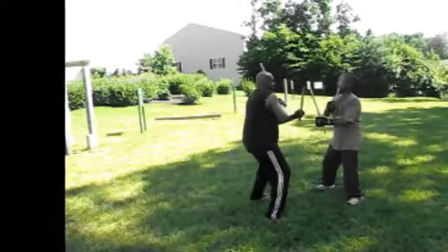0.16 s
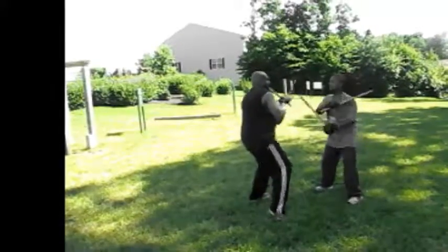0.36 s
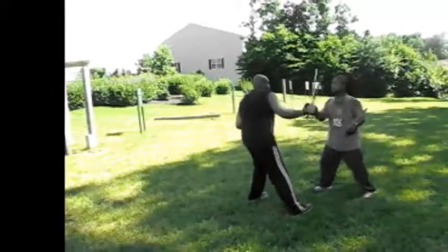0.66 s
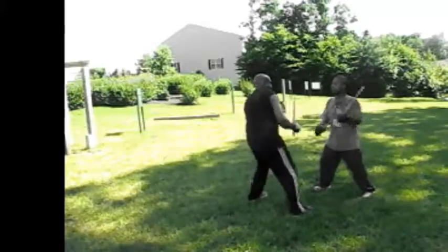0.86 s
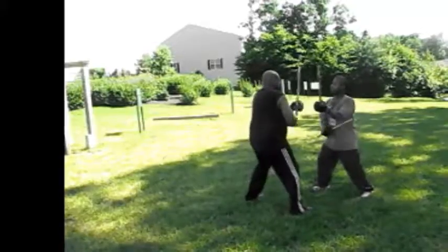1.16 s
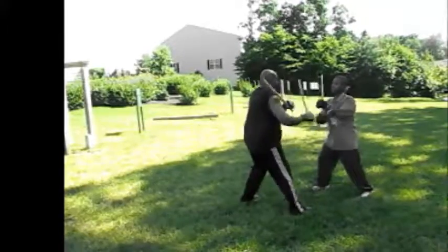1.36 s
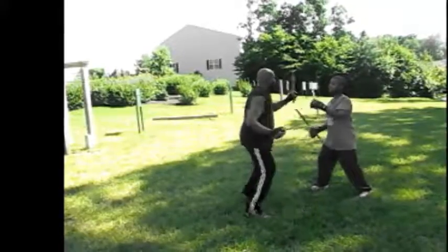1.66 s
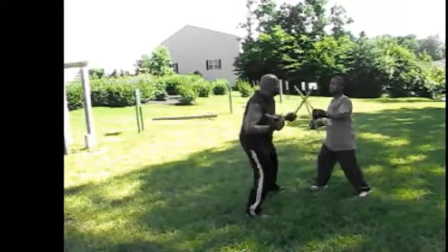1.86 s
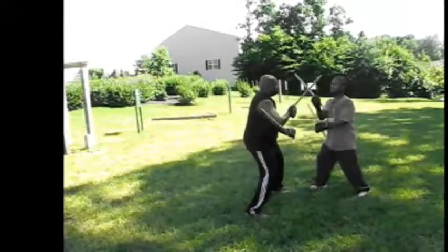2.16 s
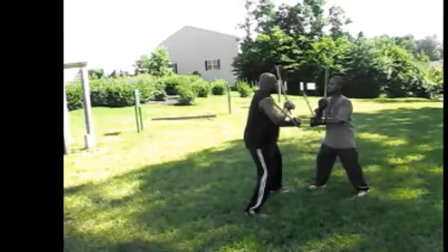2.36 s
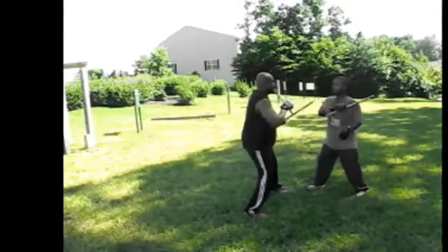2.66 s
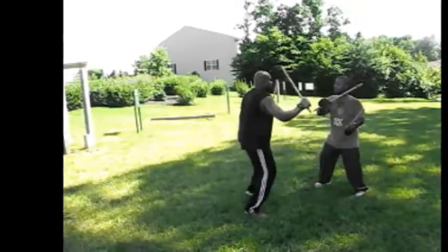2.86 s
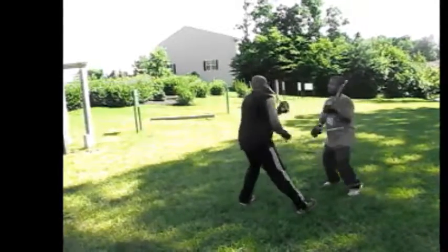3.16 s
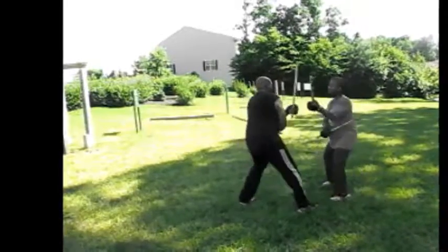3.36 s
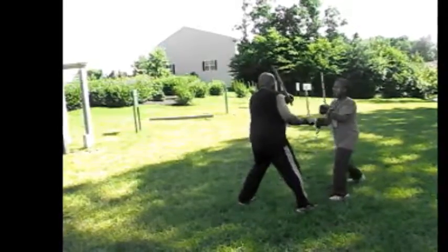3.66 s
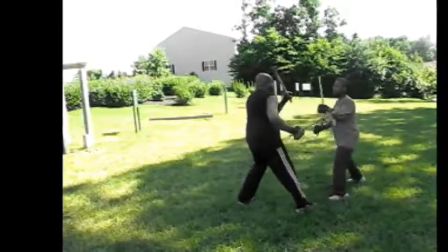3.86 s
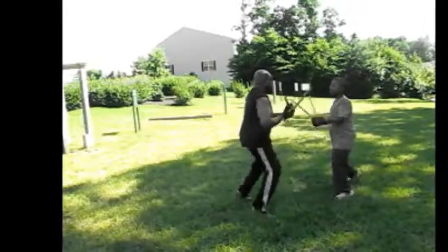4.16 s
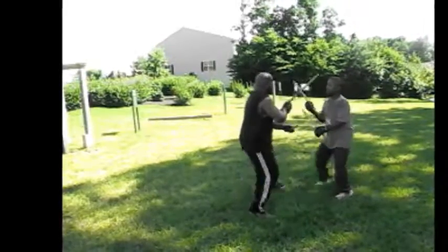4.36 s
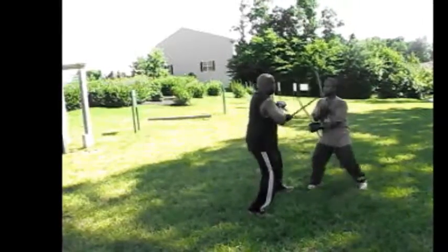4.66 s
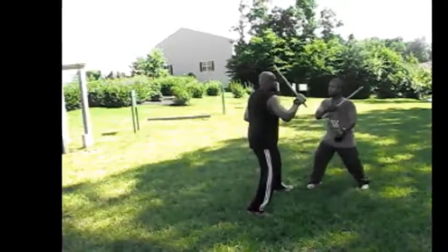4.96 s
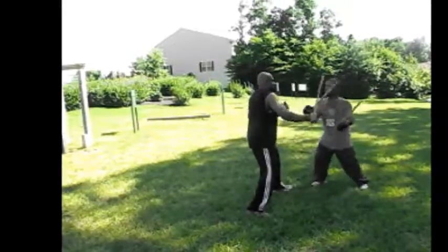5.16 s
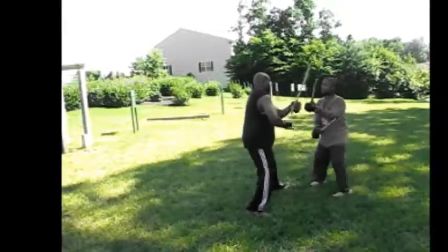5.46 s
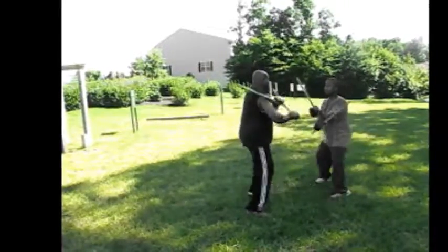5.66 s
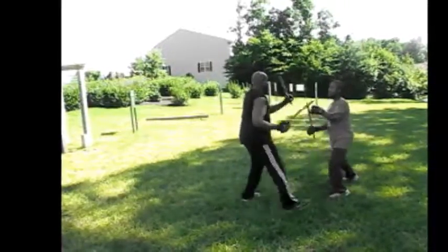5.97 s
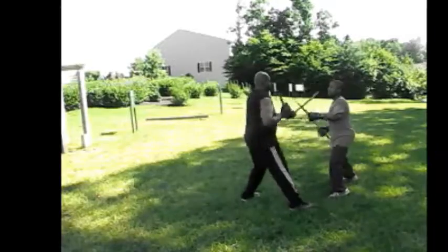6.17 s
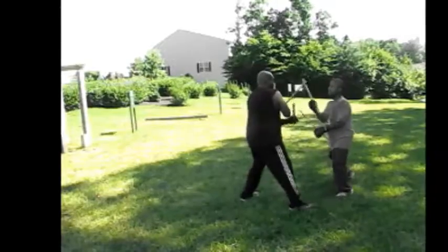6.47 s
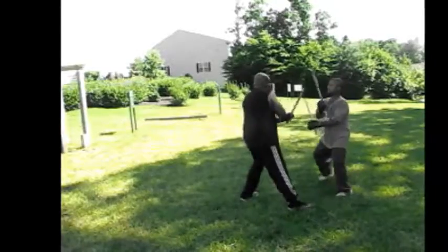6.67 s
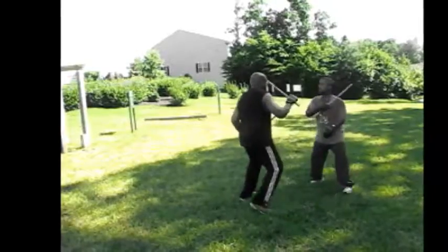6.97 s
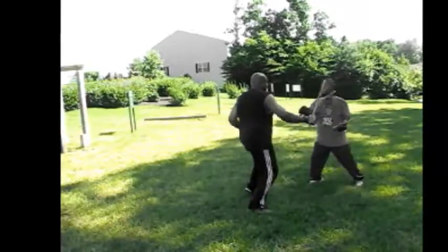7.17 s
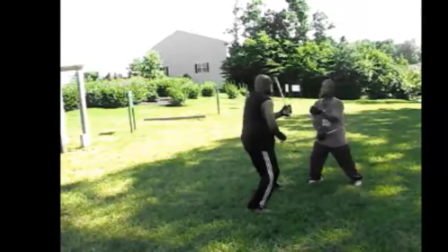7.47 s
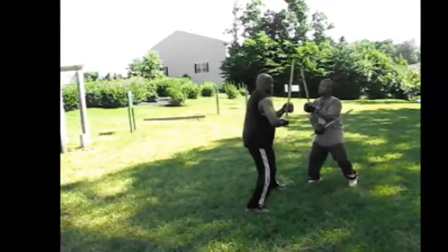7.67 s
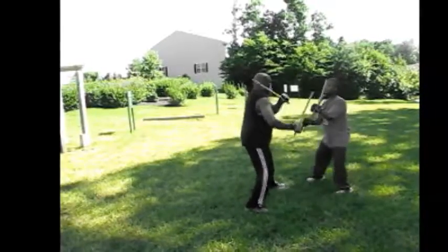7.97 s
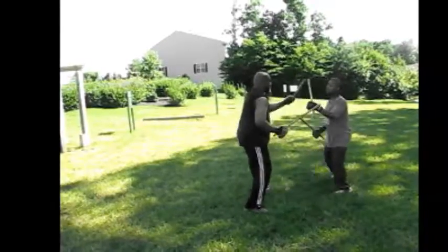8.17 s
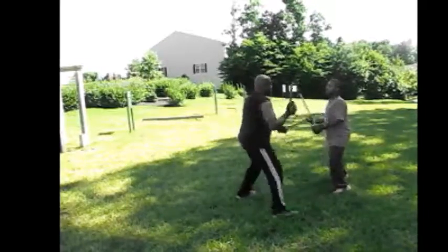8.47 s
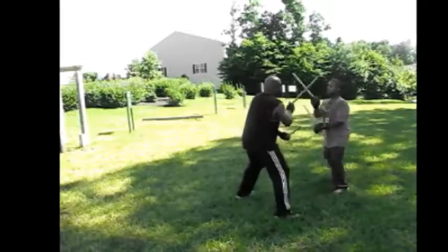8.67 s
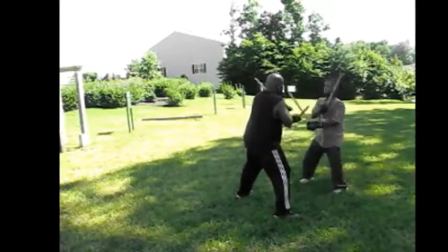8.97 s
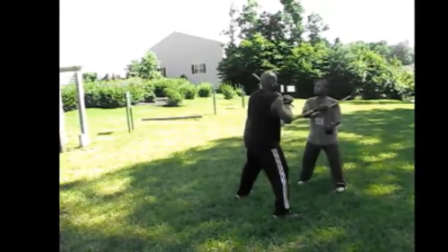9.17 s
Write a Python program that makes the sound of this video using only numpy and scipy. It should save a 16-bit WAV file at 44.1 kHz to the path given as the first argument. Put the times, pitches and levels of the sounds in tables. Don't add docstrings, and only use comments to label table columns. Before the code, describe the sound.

Sharp, dry wooden stick strikes in a steady sparring rhythm outdoors, lightly echoing off houses, over soft foot drags and quiet neighbourhood hiss.

```python
import sys
import numpy as np
from scipy import signal
from scipy.fft import rfft, irfft, next_fast_len
from scipy.io import wavfile
from scipy.ndimage import uniform_filter1d

SR = 44100
rng = np.random.default_rng(int(sys.argv[2]) if len(sys.argv) > 2 else 0)


def natural_amplitude(level_db):
    exponent = np.asarray(level_db, float) / 20
    return 10 ** exponent


def output_pcm(signal):
    pcm = np.clip(np.atleast_2d(signal).T, -1, 1) * 32767
    wavfile.write(sys.argv[1], SR, np.round(pcm).astype(np.int16))


N = 411453
LEAD = 2000


def level(x, db):
    return x * natural_amplitude(db) / np.sqrt(np.mean(x ** 2))


def colour(x, points, delay=0):
    hz, db = np.transpose(points)
    size = next_fast_len(x.shape[-1], True)
    f = np.maximum(np.fft.rfftfreq(size, 1 / SR), 1)
    log_gain = np.log(natural_amplitude(np.interp(np.log(f), np.log(hz), db)))
    fold = irfft(log_gain, size)
    fold[1:size // 2] *= 2
    gain = np.exp(rfft(fold[:size // 2], size) - 2j * np.pi * f * delay / SR)
    return irfft(rfft(x, size) * gain, size)[..., :x.shape[-1]]


def band(x, hz, width):
    return signal.lfilter(*signal.iirpeak(hz, hz / width, SR), x)


def low_pass(x, hz):
    return signal.lfilter(*signal.butter(2, hz, fs=SR), x)


def walk(rate):
    k = int(SR / rate)
    held = np.repeat(rng.standard_normal(N // k + 1), k)
    return 1.4 * uniform_filter1d(uniform_filter1d(held, k), k)[:N]


def pair(length, alike_hz):
    mid, side = rng.standard_normal((2, length))
    side = signal.lfilter(*signal.butter(1, alike_hz, "high", fs=SR), side)
    return np.array([mid + side, mid - side])


def ring(t, hz, t60, rise):
    t = np.maximum(t, 0)
    decay = np.exp(-np.log(1000) * t / t60)
    return (1 - np.exp(-t / rise)) * decay * np.sin(2 * np.pi * hz * t)


def fibres(length):
    hiss = signal.lfilter(*signal.butter(2, 5000, "high", fs=SR), rng.standard_normal(length))
    return hiss * np.exp(-np.log(1000) * np.arange(length) / SR / 0.027)


# time in s, strength in dB, hardness in dB,
# strength thrown sideways in dB.
STRIKES = [(-.0075, -5.5, -1.5, -10.5), (.3041, -8.5, -3.5, -17), (0.7262, -13, -6.5, -14),
           (1.1174, -6.5, 0.5, -11), (1.486, -13.5, 3, -7), (1.803, -10.5, 4.5, -14.5),
           (2.2584, -5, -0.5, -10.5), (2.592, -6, -4.5, -11.5), (2.6434, -9, -10, -18),
           (3.0177, -9.5, -2, -7.5), (3.3723, -2.5, -7.5, -9.5), (3.77, -7.5, -1.5, -6.5),
           (4.0853, -4.5, 1.5, -8.5), (4.4914, -6.5, 4, -11), (4.7818, -16.5, -8, -17),
           (5.1801, -9.5, -0.5, -6.5), (5.4967, -7, 1.5, -8), (5.8411, -7.5, 5, -8), (6.1258, -10, 4, -12),
           (6.5306, -7.5, 1.5, -10.5), (6.807, -17.5, 0.5, -19.5), (7.1866, -8, 0.5, -7.5),
           (7.5993, -5, -0.5, -12), (7.9792, -8, 0.5, -9), (8.285, -8, 2, -11), (8.7559, -3.5, -4.5, -10.5),
           (9.1041, -8.5, -4.5, -18.5)]
# low, middle, high and crack pitch in Hz.
SPOTS = [(2000, 2600, 3900, 3500), (2240, 3130, 4700, 3100), (1714, 2900, 4400, 2730),
         (2300, 2880, 4100, 2950), (2030, 2460, 4590, 2500), (1855, 3580, 5100, 5100),
         (2280, 3430, 4170, 3490), (2080, 2714, 3510, 3380), (2110, 2710, 4130, 3380),
         (1930, 2820, 4730, 2900), (2026, 2600, 4580, 2930), (1456, 3640, 4400, 3450),
         (1933, 3500, 4060, 4000), (2094, 3430, 4150, 4330), (2030, 2690, 3690, 3500),
         (1546, 2554, 4150, 3000), (2130, 3600, 4550, 3010), (2110, 2600, 4160, 4110),
         (2300, 3570, 3970, 3900), (2120, 2740, 5500, 5510), (1990, 2260, 3870, 2200),
         (1870, 3350, 5020, 4870), (1980, 3605, 4200, 3620), (1976, 2516, 4200, 6440),
         (2280, 3510, 4040, 3880), (2084, 3300, 4290, 3510), (2153, 3360, 4090, 3340)]
# low mode level in dB, bounce lag in ms, bounce level in dB,
# ground reflection lag in ms.
CONTACTS = [(-32.5, 1.5, -3.5, 3), (-23, 1.16, -4.5, 3.42), (-26.5, 0.69, 2, 2.1), (-16, .85, -6, 4.04),
            (-21, .89, -1.7, 3.6), (-22, 0.56, 8, 3.6), (-19.5, 1.52, -7.5, 5.6), (-17.5, 0.79, -10, 3.9),
            (-27.5, 1.64, -1.7, 3.3), (-17.5, 0.95, -14, 3.31), (-18.5, .61, -10.5, 3.4),
            (-21, 1.23, -2.5, 3.34), (-17, 1.06, -3, 2.4), (-25.5, 0.5, -6.5, 3.1),
            (-24.5, 0.533, -5, 3.26), (-21, 1.2, 7, 3.02), (-16.5, 1.17, -5, 1.6), (-18.5, 1.28, -4, 2.7),
            (-21.5, 1, 1.8, 5.6), (-19, 0.67, -2.5, 2.8), (-21, 0.36, -34, 3.8), (-20.5, 1.5, -12, 3.16),
            (-16.5, .65, 5.5, 3.15), (-19.5, .56, 2.7, 5.2), (-22, .82, 2, 2.61), (-24.5, 1.363, -10, 2.5),
            (-24, 1.3, -11, 2.3)]
# pitch in Hz, level in dB, t60 in s.
STICK_MODES = [(308, -10, 0.054), (660, -8.5, 0.039), (1022, -4.5, 0.047), (1262, -8, 0.04),
               (1490, -2.5, 0.036), (1665, -4.5, 0.031), (2018, -1.5, 0.034), (2298, -4.5, 0.025),
               (2600, -4, 0.031), (2819, -2.5, 0.028), (3311, -4.5, 0.024), (3580, 0, 0.015),
               (4042, -3, 0.023), (4736, -5, 0.024), (5370, -9, 0.0053), (5665, 2, 0.013),
               (6380, 0.5, 0.013), (7460, 0.5, 0.0072), (8550, 0.5, 0.0077), (10300, 0, 0.0071),
               (13500, -12.5, 0.0045)]
TONE_HZ = np.log([900, 1800, 3000, 4800, 9000])
GRIP = 1.34
GROUND_DB, GROUND_FALL = -7.5, 0.49


def sticks():
    out, t = np.zeros(N + 2 * LEAD), np.arange(LEAD)[:, None] / SR
    hz, db, t60 = np.transpose(STICK_MODES)
    chance = rng.standard_normal((len(STRIKES), 3, 2, len(hz)))
    for strike, spot, contact, draw in zip(STRIKES, SPOTS, CONTACTS, chance):
        s, mid_db, hard, _ = strike
        *favoured, crack_hz = spot
        low_db, bounce_ms, bounce_db, ground_ms = contact
        first = int(s * SR) - 40
        start = LEAD + first
        lead_db = -max(0, bounce_db)
        gains_db = lead_db, lead_db + bounce_db, GROUND_DB - GROUND_FALL * hard
        snap_db = mid_db - 21.5 + 1.4 * hard
        high_db = mid_db - 7 + 0.9 * hard
        tone = np.array([low_db - 15, low_db + 0.5, mid_db - 7.5, high_db, snap_db + 2.5])
        spread = db + np.interp(np.log(hz), TONE_HZ, tone)
        for lag, gain_db, (weight, detune) in zip((0, bounce_ms, ground_ms), gains_db, draw):
            since = t + first / SR - s - lag / 1000
            crack_db = [mid_db + 3 + 0.96 * hard - 2.4 * lag, snap_db + 15 - 3.1 * lag]
            crack = ring(since, np.array([crack_hz, 9500]), np.array([.0032, .0014]), .00004) @ natural_amplitude(crack_db)
            weights = np.sign(detune) * natural_amplitude(spread + 2.6 * weight)
            body = ring(since, hz * (1 + 0.03 * detune), t60 / GRIP, 0.000067) @ weights
            favoured_t60 = np.array([.026, .022, .018]) / GRIP
            favoured_gain = natural_amplitude(tone[1:4] + np.array([3.5, 5, 4]))
            body += ring(since, np.array(favoured), favoured_t60, 0.00042) @ favoured_gain
            out[start:start + LEAD] += natural_amplitude(gain_db) * (crack + body)
        out[start + 40:start + 40 + LEAD] += natural_amplitude(snap_db - 7.5) * fibres(LEAD)
    return signal.sosfilt(signal.butter(3, 450, "high", fs=SR, output="sos"), out)


def thrown():
    out, t = np.zeros((2, N + 2 * LEAD)), np.arange(LEAD)[:, None] / SR
    hz, db, t60 = np.transpose(STICK_MODES)
    chance = rng.standard_normal((len(STRIKES), 2, len(hz)))
    broad = db + np.interp(np.log(hz), TONE_HZ, [-16.5, -4.5, 3.0, 2.5, -10.0])
    near_far_db = [[2.1], [0]]
    for (s, *_, out_db), (*favoured, _), (weight, detune) in zip(STRIKES, SPOTS, chance):
        weights = np.sign(detune) * natural_amplitude(broad + 0.9 * weight)
        blow = ring(t, hz * (1 + 0.02 * detune), 0.31 * t60, .0001) @ weights
        blow += ring(t, np.array(favoured), 0.009, .0001) @ natural_amplitude([-12, -9, -5.5])
        first = LEAD + int(s * SR)
        out[:, first:first + LEAD] += level(blow, out_db - 16.5) * natural_amplitude(near_far_db)
    return out


# lag in s, level in dB, smear in ms, left minus right in dB,
# top in Hz.
ECHOES = [
    (0.031, -36, 1.3, 0.5, 6000),
    (0.046, -39, 3.8, 9.5, 5000),
    (0.0542, -36, 0.46, 8.5, 11600),
    (0.108, -43.5, 2, -2, 4000),
    (.196, -42.5, 4.9, -3.5, 4470),
    (.222, -46, 6.3, 1, 5000),
]
SCATTER_DB, SCATTER_START_S, SCATTER_RISE_S, SCATTER_T60_S = -41, 0.0029, .012, 1.276


def surroundings(near, far):
    t = np.arange(SR) / SR
    wash = colour(pair(SR, 900), [(300, -7.5), (1500, 4.5), (4500, 3.0), (7000, -5.5), (14000, -12)])
    build_up = 1 - np.exp(-np.maximum(t - SCATTER_START_S, 0) / SCATTER_RISE_S)
    response = level(wash, -22.0) * natural_amplitude(SCATTER_DB - 60 * t / SCATTER_T60_S) * build_up
    for delay, echo_db, smear_ms, pan_db, top_hz in ECHOES:
        shape = (t >= delay) * np.exp(-np.abs(t - delay) * 1000 / smear_ms)
        burst = low_pass(pair(SR, 1500) * shape, top_hz)
        response = response + level(burst, echo_db) / np.sqrt(SR) * natural_amplitude([[pan_db / 2], [-pan_db / 2]])
    early = t < .065
    back = signal.fftconvolve(near[None], response * early, axes=1)
    back = back + signal.fftconvolve(far[None], response * ~early, axes=1)
    return back[:, :len(near)]


# lag in s, level in dB, top in Hz, left minus right in dB.
BACK_WALL = (.262, -42, 3500, 2)


def back_wall(dry):
    lag, db, top_hz, pan_db = BACK_WALL
    slap = low_pass(np.roll(dry, int(lag * SR)), top_hz)
    return slap * natural_amplitude(db + np.array([[pan_db], [-pan_db]]) / 2)


# start in s, length in s, level in dB.
STEPS = [(-.1, 0.14, -78), (0.445, 0.26, -78), (1.145, .2, -78), (1.44, 0.24, -70), (1.85, .12, -72),
         (2.753, 0.32, -75.5), (3.013, .23, -69.5), (3.383, 0.37, -87.5), (3.848, 0.43, -71),
         (4.287, 0.2, -72), (5.049, 0.42, -78), (5.487, 0.43, -71.5), (5.845, 0.22, -70),
         (6.15, 0.2, -77.5), (6.63, .43, -74), (7.2, 0.12, -88), (7.704, 0.16, -77.5), (7.992, 0.58, -72.5),
         (8.9, 0.17, -81), (9.15, 0.22, -81.5)]
# pitch in Hz, level in dB per Hz.
GRASS = [(500, -12), (1200, -8), (2500, 0.5), (5000, 4.5), (8000, -1), (12000, -6), (15600, -8),
         (16000, -43.5)]
STEP_ATTACK_S, STEP_RELEASE_S, STEP_SWELL_DB, GRASS_REST_DB = 0.055, 0.029, 4.5, -91.5


def feet():
    t, drag = np.arange(N) / SR, natural_amplitude(GRASS_REST_DB)
    for s, length, db in STEPS:
        attack, release = (t - s) / STEP_ATTACK_S, (s + length - t) / STEP_RELEASE_S + 1
        shape = np.clip(np.minimum(attack, release), 0, 1)
        swell_db = STEP_SWELL_DB * np.clip((t - s) / length - 1, -1, 0)
        drag = np.hypot(drag, shape ** 2 * natural_amplitude(db + swell_db))
    grains = pair(N, 500) * natural_amplitude(1.6 * rng.exponential(size=N))
    return level(colour(grains, GRASS), 9) * drag * natural_amplitude(3.8 * walk(31) + 2.1 * walk(27))


# time in s, level in dB, length in ms, centre in Hz.
BRUSHES = [(.64, -60, 3.7, 4480), (1.68, -49.5, 3.3, 2814), (5.764, -52, 5.4, 3560),
           (7.869, -53, 4.5, 3020), (8.547, -48, 4.2, 2400), (8.41, -62, 29, 10200), (1.331, -52, 11, 2400),
           (1.464, -53, 20, 3950), (2.80, -61, 7.4, 9000), (2.974, -52.5, 10.5, 2830),
           (3.235, -59, 5.9, 7000), (3.97, -54.5, 20, 2760), (4.199, -56, 15, 2990),
           (4.217, -39.5, 3, 2600), (4.229, -46, 17, 1850), (5.219, -48, 7.5, 4030),
           (7.035, -54, 9.3, 4230), (7.043, -56.5, 7.4, 1770), (7.177, -51.5, 4, 3010)]


def brushes():
    out, t = np.zeros((2, N)), np.arange(-LEAD, LEAD) / SR
    for s, db, length_ms, hz in BRUSHES:
        rub = level(band(band(pair(2 * LEAD, 4500), hz, 1.7 * hz), hz, 0.72 * hz), db)
        middle = int(s * SR)
        out[:, middle - LEAD:middle + LEAD] += rub * np.exp(-(t * 1000 / length_ms) ** 2)
    return out


# time in s, level in dB.
BREEZE = [(0, -83.5), (.6, -79), (1.8, -75.5), (2.9, -73), (4.3, -71), (4.6, -87), (5, -67.5), (6.3, -72),
          (6.6, -82), (7.1, -78), (7.4, -67), (7.8, -79), (8.3, -71), (8.75, -75), (9.33, -86)]
# time in s, level in dB, pitch in Hz.
PUFFS = [(.6, -76.5, 75.4), (1.94, -64, 66), (2.28, -65.5, 66.8), (2.59, -59.5, 65.3), (2.84, -58.5, 63),
         (3.32, -68, 75.7), (3.58, -59, 67), (3.72, -58.5, 64.5), (4.04, -74.5, 65.7), (4.46, -71.5, 80.6),
         (4.85, -57.5, 65.2), (5.1, -62, 70.7), (5.31, -58.5, 72.2), (5.57, -60, 68.5), (5.85, -59.5, 63),
         (6.03, -57.5, 62.7), (6.46, -68.5, 65.8), (7.15, -60, 66.9), (8.2, -58.5, 64.8),
         (8.32, -58.5, 63.1), (8.48, -71, 62.8)]
BREEZE_HZ, PUFF_S, PUFF_SAG_HZ_PER_S = 75, 0.049, 100


def wind():
    t = np.arange(N) / SR
    breeze = natural_amplitude(np.interp(t, *np.transpose(BREEZE)))
    size, pull = breeze, breeze * BREEZE_HZ
    for s, db, hz in PUFFS:
        puff = natural_amplitude(db) * np.exp(-((t - s) / PUFF_S) ** 2)
        size, pull = size + puff, pull + puff * (hz - PUFF_SAG_HZ_PER_S * (t - s))
    phase = 2 * np.pi * np.cumsum(pull / size * (1 + 0.038 * walk(18))) / SR
    flutter = natural_amplitude(3.2 * walk(12))
    rumble = level(band(band(pair(N, 300), 49, 25), 49, 25), -3)
    ports = .08 * np.array([[1], [-1]]) * walk(6)
    tone_size = size - breeze + 0.97 * breeze * flutter
    return np.sin(phase + ports) * tone_size * natural_amplitude(-0.5) + rumble * breeze


CHIRP_S, CHIRP_LENGTH_S, CHIRP_HZ, CHIRP_FALL_HZ, CHIRP_DB = 5.028, .015, 5150, 750, -67


def chirp():
    u = (np.arange(N) / SR - CHIRP_S) / CHIRP_LENGTH_S
    hz = CHIRP_HZ - CHIRP_FALL_HZ * np.clip(u + .4, -2, 2) ** 2
    return natural_amplitude(CHIRP_DB) * np.exp(-u ** 2) * np.sin(2 * np.pi * np.cumsum(hz) / SR)


# pitch in Hz, level in dB per Hz.
TOWN = [(30, -12), (100, -1.5), (250, -2.5), (450, -4), (850, 1), (1300, -3), (2500, -7.5), (4500, -13),
        (7000, -24.5), (12000, -28.5), (16000, -39.5)]
# pitch in Hz, width in Hz, level in dB.
FAN = [
    (114, 40, -77),
    (227.9, 5.8, -78),
]


def town():
    hiss = level(colour(pair(N, 1200), TOWN), -63.5) * natural_amplitude(0.32 * walk(2.87))
    return hiss + sum(level(band(rng.standard_normal(N), hz, width), db) for hz, width, db in FAN)


def scene():
    dry = sticks()
    left_tone = [(300, -3.5), (1100, -1.9), (2400, -2.5), (5000, -2.5), (8500, -0.5), (13000, 0.0)]
    left = colour(dry, left_tone, delay=1.05)
    direct = np.array([left, dry]) * natural_amplitude(-0.57)
    strikes = direct + back_wall(dry) + surroundings(*thrown())
    return strikes[:, LEAD:LEAD + N] + feet() + brushes() + wind() + town() + chirp()


def roll_off(x):
    return signal.sosfilt(signal.butter(12, 16800, fs=SR, output="sos"), x)


CEILING, SHAVED_ABOVE_HZ, TOP_HZ = .92, 500, 16200


def record(dry):
    dry = dry + level(band(rng.standard_normal(N), 7880, 40), -93)
    shaved = dry - np.clip(dry, -CEILING, CEILING)
    dry = dry - signal.lfilter(*signal.butter(2, SHAVED_ABOVE_HZ, "high", fs=SR), shaved)
    cut = signal.sosfilt(signal.butter(10, TOP_HZ, fs=SR, output="sos"), dry)
    return roll_off(np.clip(cut, -1, 1))


dry = scene()
out = record(dry)
output_pcm(out)
```